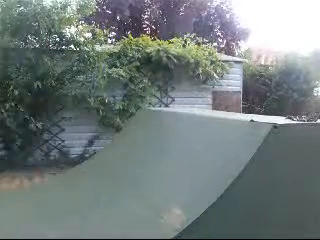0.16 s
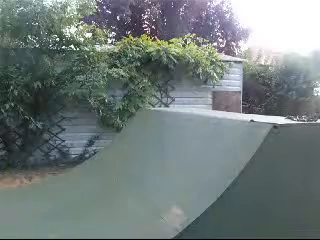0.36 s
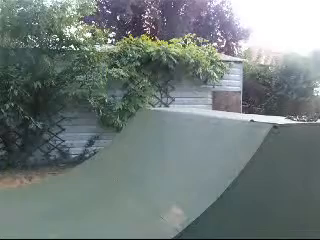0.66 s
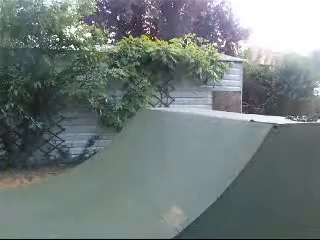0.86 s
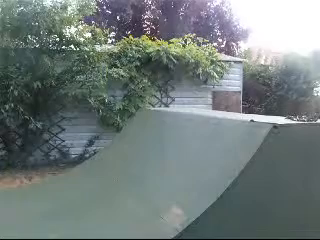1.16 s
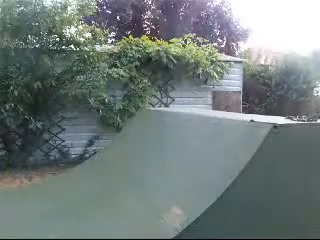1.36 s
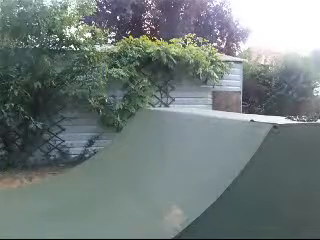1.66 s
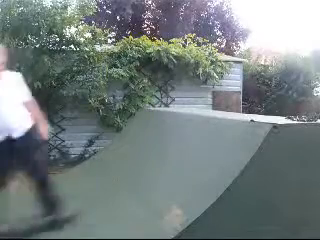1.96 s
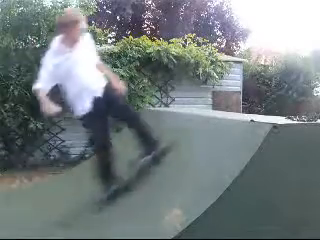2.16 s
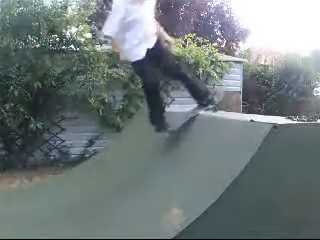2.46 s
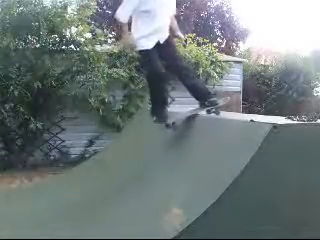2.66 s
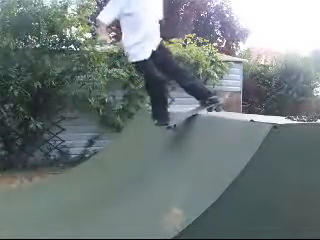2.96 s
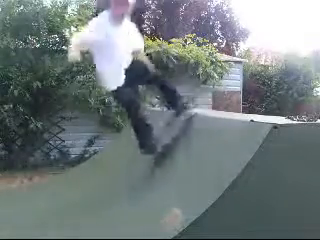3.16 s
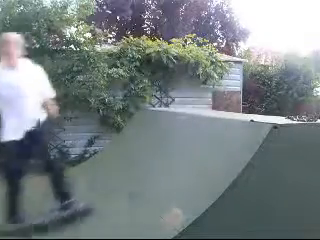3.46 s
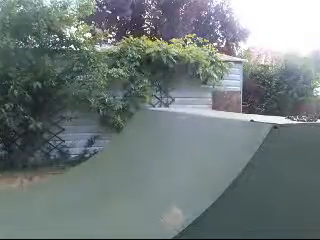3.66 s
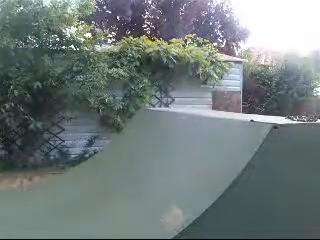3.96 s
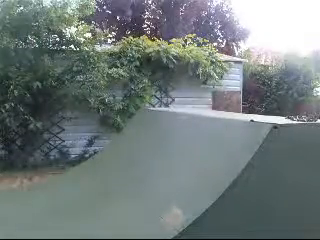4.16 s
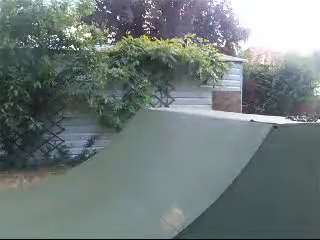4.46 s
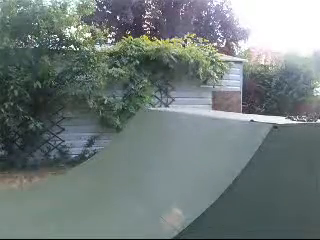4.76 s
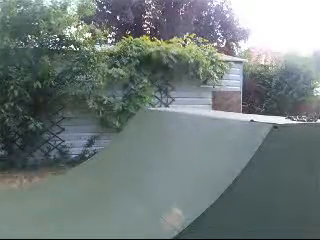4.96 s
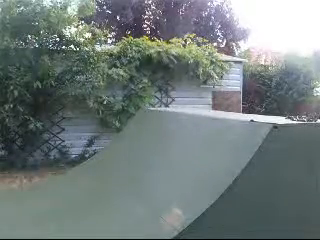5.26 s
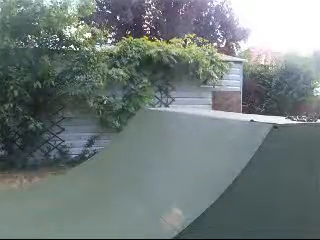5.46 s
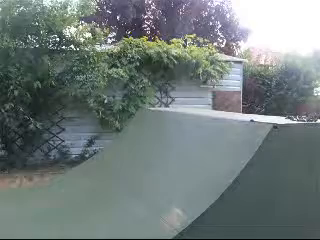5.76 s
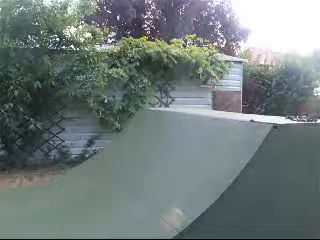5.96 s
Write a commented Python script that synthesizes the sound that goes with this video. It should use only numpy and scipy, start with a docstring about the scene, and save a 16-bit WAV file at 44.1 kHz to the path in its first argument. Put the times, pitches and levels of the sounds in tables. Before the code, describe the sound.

A skateboard rumbles back and forth on a hollow wooden ramp outdoors, with sharp clacks and heavy booming knocks while an engine drones faintly away.

```python
"""Garden, hollow wooden ramp: a skateboard rolls to and fro and clacks on the edge and the deck.
Rolling is noise and dense bumps through plywood modes; clacks and seams are noise snaps and ringing modes.
A short squeak is resonated noise. An engine, wavering low orders plus rough wash, drones into the distance.
Behind: outdoor air, wind puffs, a camera's whine; its one microphone overloads on the hardest hits."""
import sys
import numpy as np
from scipy import signal
from scipy.fft import rfft, irfft
from scipy.io import wavfile
from scipy.ndimage import uniform_filter1d

SR = 44100
rng = np.random.default_rng(int(sys.argv[2]) if len(sys.argv) > 2 else 0)


def store_pcm(level_fs):
    """Save levels as 16-bit WAV."""
    pcm = np.round(np.clip(level_fs, -1, 1) * 32767).astype(np.int16)
    wavfile.write(sys.argv[1], SR, np.atleast_2d(pcm).T)


N = 269010
T = np.arange(N) / SR


def amp(db):
    """Amplitude factor of a level in dB."""
    return 10 ** (np.asarray(db) / 20)


def noise(count=N):
    """White noise."""
    return rng.standard_normal(count)


def evened(x):
    """Scales to rms 1."""
    return x / np.sqrt(np.mean(x ** 2) + 1e-20)


def curve(rows, column):
    """One table column, interpolated at every sample."""
    rows = np.array(rows)
    return np.interp(T, rows[:, 0], rows[:, column])


def bells(rows):
    """Sum of Gaussian swells: centre_s, width_s, level_db."""
    return sum(amp(db) * np.exp(-((T - s) / width_s) ** 2) for s, width_s, db in rows)


def colour(x, points):
    """Filters by a spectrum (freq_hz, density_db), to rms 1."""
    freq_hz, db = np.transpose(points)
    bins_hz = np.fft.rfftfreq(len(x), 1 / SR)
    gain_db = np.interp(np.log(bins_hz + 1), np.log(freq_hz + 1), db)
    return evened(irfft(rfft(x) * amp(gain_db), len(x)))


def wobble(hz):
    """Slow random drift: noise low-passed at hz, rms 1."""
    return evened(signal.lfilter(*signal.butter(2, hz, fs=SR), noise()))


def resonate(x, hz, width_hz):
    """Moving resonance: shifts the curve hz to zero, smooths, shifts back; rms 1."""
    turn = np.exp(2j * np.pi * np.cumsum(hz) / SR)
    pole = np.exp(-np.pi * width_hz / SR)
    smooth = signal.lfilter([1 - pole], [1, -pole], x / turn)
    return evened((turn * smooth).real)


def add(mix, start_s, sound):
    """Adds a sound in place, cut at the end of the mix."""
    part = mix[round(start_s * SR):][:len(sound)]
    part += sound[:len(part)]


def ring(modes, spread_db, rise_s=0.00015, near_hz=None):
    """One blow, peak 1, cut at 1/3 s: mode shares depend on where it lands."""
    t, out = np.arange(SR // 3) / SR, 0
    for (hz, db, t60_s), (share, shift) in zip(modes, noise((len(modes), 2))):
        if near_hz:
            db = db - 4.5 * abs(np.log2(hz / near_hz))  # dB per octave away
        decay = amp(db + spread_db * share - 60 * t / t60_s)
        out = out + decay * np.sin(2 * np.pi * hz * (1 + 0.055 * shift) * t)
    out = out * (1 - np.exp(-t / rise_s))
    return out / abs(out).max()


# crack spectrum: freq_hz, density_db
CRACK_SPECTRUM = [(880, -4), (1500, 6.5), (2000, 5.5), (3500, 1), (6450, 0.5), (7970, 0), (12300, -5.5),
                  (15900, -43), (22000, -120)]


def snap(t60_s, rise_s):
    """Bright noise burst: fast rise, exponential decay."""
    t = np.arange(4096) / SR
    return colour(noise(4096), CRACK_SPECTRUM) * (1 - np.exp(-t / rise_s)) * amp(-60 * t / t60_s)


# wheel speed as heard, one sub-table per stretch: time_s, hiss_db
ROLL_STRETCHES = [
    [(0, -29), (.07, -34.5), (.19, -32), (.3, -50), (.39, -68)],
    [(1.03, -78), (1.27, -42), (1.385, -46), (1.41, -41), (1.59, -23), (1.75, -27.5), (2.1, -27.5),
     (2.28, -26), (2.45, -35.5), (2.545, -48)],
    [(3.22, -60), (3.35, -33.5), (3.55, -25), (3.75, -29), (3.88, -31), (4.09, -24.5), (4.21, -29.5),
     (4.36, -35), (4.42, -40.5), (4.55, -46), (4.7, -45.5), (4.9, -56.5)],
    [(5.6, -53.5), (5.72, -41), (5.78, -44.5), (5.9, -27), (6.1, -28.5)],
]
# rider's weight pressing into a curve of the ramp: centre_s, width_s, boom_db
PRESSES = [(0, .04, -13), (.19, 0.059, -19.5), (1.65, 0.17, -19.5), (2.2, 0.14, -22), (2.39, 0.053, -23),
           (3.6, 0.2, -17.5), (4.17, 0.12, -24), (4.32, .05, -27), (4.64, 0.061, -32), (5.8, 0.025, -24),
           (5.9, 0.082, -21), (6.1, .05, -18)]
# shoe or tail sliding, hiss alone: centre_s, width_s, level_db
SLIDES = [(1.36, 0.036, -37), (4.75, 0.16, -49), (5.67, 0.067, -40)]
# ramp modes, 3 of the hollow then the plywood: freq_hz, level_db, t60_s
RAMP_MODES = [(85.7, -19, 1), (102.5, 0.5, 0.26), (146.2, -10.5, 0.42), (201, 4.5, 0.045),
              (268.7, 0.5, 0.048), (321.6, -6.5, 0.09), (395.8, 0.5, 0.057), (491, -1, 0.036),
              (605, -3.5, 0.037), (672, -0.5, 0.02)]
# plywood rumble spectrum: freq_hz, density_db
RUMBLE_SPECTRUM = [(30, -30), (100, -3.5), (170, -10), (319, -3.5), (388, -4.5), (838, -13.5),
                   (1310, -14.5), (1600, -14.5), (2080, -21.5), (3520, -120)]
# grit hiss spectrum: freq_hz, density_db
HISS_SPECTRUM = [(530, -51), (900, -0.5), (1210, -6), (1350, 0.5), (1520, -11), (1810, -6.5), (2430, -7),
                 (3730, -8.5), (12300, -16.5), (15900, -53), (22000, -120)]
FULL_SPEED_HISS_DB, FULL_SPEED_ROAR_DB, ROAR_DB_PER_HISS_DB = -28, -22.5, 1.19
PRESS_ROAR_GAIN = 0.285  # roar added per unit of press
FLAT_BOOM_RE_HISS_DB = -11.5  # boom between presses
SHUDDER_RE_THUMP_DB, SHUDDER_T60_S = -21.5, 0.26  # plywood roars on after a thump
WHIRR_HZ, WHIRR_WANDER, WHIRR_WIDTH_HZ = 3760, .09, 280  # bearings; wander is a fraction


def impulses(per_s, db_scale, cap):
    """Sparse random impulses with exponentially spread levels."""
    return amp(db_scale * np.minimum(rng.exponential(1, N), cap)) * (rng.random(N) < per_s / SR)


def bumps_through(modes):
    """Dense small bumps of either sign drive a set of ramp modes."""
    bumps = impulses(1500, 1.15, 4) * rng.choice([-1, 1], N)
    return evened(signal.oaconvolve(bumps, ring(modes, spread_db=0))[:N])


def rolling():
    """Bumps under the wheels drive the plywood; grit hisses, bearings whirr."""
    boom = bumps_through(RAMP_MODES[:3])
    skin = bumps_through(RAMP_MODES[3:])
    roar = evened(skin + 0.71 * colour(noise(), RUMBLE_SPECTRUM))

    whirr_hz = WHIRR_HZ * (1 + WHIRR_WANDER * wobble(1.1))
    whirr = amp(1.5 * wobble(34)) * resonate(noise(), whirr_hz, WHIRR_WIDTH_HZ)
    grit = colour(impulses(1200, 5, 5), HISS_SPECTRUM)
    hiss = evened(colour(noise(), HISS_SPECTRUM) + 0.48 * grit + 0.28 * whirr)

    hiss_db = curve(np.vstack(ROLL_STRETCHES), column=1)
    press = bells(PRESSES)
    shudder = sum((T > s) * amp(thump_db + SHUDDER_RE_THUMP_DB - 60 * abs(T - s) / SHUDDER_T60_S)
                  for s, *_, thump_db, _ in CLACKS)
    speed_roar = amp(FULL_SPEED_ROAR_DB + ROAR_DB_PER_HISS_DB * (hiss_db - FULL_SPEED_HISS_DB))
    roar_gain = speed_roar + PRESS_ROAR_GAIN * press + shudder
    boom_gain = press + amp(hiss_db + FLAT_BOOM_RE_HISS_DB)
    hiss_gain = amp(hiss_db) + bells(SLIDES)

    unevenness = wobble(15.7)  # slow and random, shared by boom, roar and hiss
    wood = amp(1.2 * unevenness) * boom_gain * boom + amp(1.3 * unevenness) * roar_gain * roar
    return wood + hiss_gain * amp(1.35 * unevenness + 0.42 * wobble(210)) * hiss


# board and truck clacks: start_s, crack_db, board_db, board_hz, thump_db, thump_hz
CLACKS = [(0.0571, -3, -1, 655, -22, 85), (0.138, -12.5, 0.5, 1730, -6.5, 228),
          (0.16, -17, -12, 1100, -12, 240), (0.2114, -35, -15, 1500, -24, 102),
          (0.245, -33, -23, 1500, -29, 260), (0.313, -26, -21, 1360, -20.5, 102),
          (0.535, -24.5, -25, 1290, -42, 200), (0.6059, -33.5, -20, 696, -46, 300),
          (0.655, -23.5, -16, 1270, -44, 200), (0.933, -30, -28.5, 751, -52, 92),
          (1.0256, -24.5, -27.5, 1390, -46, 97), (1.142, -20, -15.5, 1090, -30, 118),
          (1.228, -24, -15.5, 732, -38, 200), (1.333, -26, -21, 942, -19, 250),
          (1.3557, -20, -32, 600, -32, 196), (1.391, -8, -3.5, 696, -1.5, 250),
          (1.3969, -13, -19, 748, 4, 210), (2.019, -13.5, -14, 1300, -6, 120),
          (2.462, -26, -20.5, 600, -20, 116), (2.5498, -9.5, -5, 1400, -13, 160),
          (2.6034, -23, -20, 930, -40, 92), (2.8, -22, -32, 676, -18, 326), (2.94, -35, -38, 700, -30, 317),
          (3.1812, -8.5, -5.5, 1190, -2.5, 393), (3.1862, -16, -31, 1080, -10.5, 373),
          (3.3012, -19.5, -23, 738, -22, 385), (3.3571, -5.5, 1.5, 785, -5.5, 149),
          (4.56, -4, -11.5, 760, -32, 300), (4.572, -23, -20, 700, -14, 300),
          (4.6042, -21, -32, 754, -16, 124), (4.6209, -19, -15.5, 1310, -13, 384),
          (4.6925, -28, -25, 700, -19, 267), (4.7286, -29.5, -41, 770, -47, 146),
          (4.766, -39, -38, 900, -40, 200), (4.817, -40, -36, 1210, -50, 201),
          (4.8663, -28, -31, 1210, -54, 92), (5.7284, -4, -11, 590, 5.5, 302),
          (5.7309, -6.5, -33, 633, -2, 129)]
# board modes: freq_hz, level_db, t60_s
BOARD_MODES = [(560, -2, .02), (680, -2, .02), (800, -1, .018), (940, -2, .018), (1070, 0, .018),
               (1230, -2, .016), (1390, -1, .016), (1770, -4, .012), (2100, -6, .012)]
CRACK_HZ, CRACK_LOG_SPREAD, CRACK_LOG_RISE_PER_DB = 3800, .08, 0.05  # rises as thump outweighs crack
CRACK_COLOUR, CRACK_WIDTH_HZ = 0.95, 1600
SCRAPE_RE_CRACK_DB, SCRAPE_TOP_DB, SCRAPE_S = -15.5, -26.5, 0.035
LANDING_THUMP_DB, LANDING_CUT_DB_PER_DB = -2, 7.5  # louder thump: landing on wheels, less scrape


def clacks():
    """Crack, rattling board, boom of the ramp, short scrape as the board settles."""
    out, t = np.zeros(N), np.arange(4096) / SR
    for start_s, crack_db, board_db, board_hz, thump_db, thump_hz in CLACKS:
        rise_s = .0007 * amp(-.65 * (crack_db + 8))  # softer blows start more slowly
        crack = snap(0.013 + 3.6 * rise_s, rise_s)
        excess_db = np.clip(thump_db - crack_db, -12, 12)
        crack_hz = CRACK_HZ * np.exp(CRACK_LOG_SPREAD * noise(1)[0] + CRACK_LOG_RISE_PER_DB * excess_db)
        # struck metal or tail colours the crack
        metal = resonate(crack, np.full(len(t), crack_hz), CRACK_WIDTH_HZ)
        add(out, start_s, amp(crack_db) * (crack + CRACK_COLOUR * crack.std() * metal))

        body = ring(BOARD_MODES, spread_db=2, near_hz=board_hz)[:2000]
        t_contact = t[:400]  # contact chatters for a few ms
        chatter = noise(400) * (1 - np.exp(-t_contact / rise_s)) * amp(-60 * t_contact / 0.022)
        board = signal.oaconvolve(chatter, body)
        add(out, start_s, amp(board_db) * board / abs(board).max())

        thump = ring(RAMP_MODES, spread_db=2, rise_s=.001, near_hz=thump_hz)
        add(out, start_s, amp(thump_db) * thump)

        landing_cut_db = LANDING_CUT_DB_PER_DB * max(thump_db - LANDING_THUMP_DB, 0)
        scrape_db = min(crack_db + SCRAPE_RE_CRACK_DB, SCRAPE_TOP_DB) - landing_cut_db
        stroke = np.clip(t / 0.0017, 0, 1) / (1 + (t / SCRAPE_S) ** 6)  # holds, then stops short
        rub = noise(len(t))
        rattle = evened(signal.oaconvolve(rub, body)[:len(t)])  # scrape shakes the board too
        add(out, start_s, amp(scrape_db) * stroke * (colour(rub, CRACK_SPECTRUM) + 0.95 * rattle))
    return out


# wheels crossing seams and screw heads: start_s, knock_db, tick_db
SEAMS = [(1.579, -2, -16), (1.657, -5, -40), (1.694, -8.5, -26), (1.736, -8.5, -7.5), (1.838, -36, -10.5),
         (2.095, -3, -7.5), (2.132, -6, -39), (2.17, -5.5, -21), (2.236, -5.5, -27), (2.333, -8.5, -22),
         (3.462, -9, -9.5), (3.536, -2, -49), (3.594, -14, -35), (3.613, -5.5, -37), (3.693, -9, -21),
         (3.781, -22, -13), (3.973, -11, -16), (5.889, -17.5, -10.5), (5.995, -10, -28), (6.036, -23, -9.5),
         (6.081, -11.5, -18)]


def seams():
    """Seams knock upper ramp modes through the soft wheel, with a thin tick."""
    out = np.zeros(N)
    for start_s, knock_db, tick_db in SEAMS:
        knock = ring(RAMP_MODES[4:], spread_db=3, rise_s=.009, near_hz=465)
        add(out, start_s, amp(knock_db) * knock)
        tick = snap(0.0089, 0.00068)
        thin_tick = np.diff(tick) + 0.39 * tick[1:]
        add(out, start_s, amp(tick_db) * thin_tick)
    return out


SQUEAK_START_S, SQUEAK_DB, SQUEAK_T60_S = 1.002, -28, 0.12
SQUEAK_HZ, SQUEAK_RISE_HZ, SQUEAK_TOP_S = 3400, 800, .018  # pitch jumps up, sinks back


def squeak():
    """Brief rough chirp of slipping rubber, shoe or bushing: resonated noise."""
    age_s = np.maximum(T - SQUEAK_START_S, 0)
    hz = SQUEAK_HZ + SQUEAK_RISE_HZ * np.exp(-4 * (age_s / SQUEAK_TOP_S - 1) ** 2)
    envelope = np.minimum(age_s / .006, 1) * amp(SQUEAK_DB - 60 * age_s / SQUEAK_T60_S)
    return envelope * resonate(noise(), hz, width_hz=340)


# wall and fence: delay_s, level_db
ECHOES = [(0.017, -18), (.021, -18)]


def garden(x):
    """Two echoes and a short scatter from wall and bushes."""
    t = np.arange(SR // 5) / SR
    scatter = noise(len(t)) * amp(-60 * t / .16) * (t > .004)
    response = amp(-14) * scatter / np.linalg.norm(scatter)
    response[0] = 1  # direct sound
    for delay_s, db in ECHOES:
        smear = noise(12)  # rough surfaces blur each echo
        add(response, delay_s, amp(db) * smear / np.linalg.norm(smear))
    return signal.oaconvolve(x, response)[:N]


# firing rate: time_s, rate_hz
FIRING = [(0, 18.6), (1, 17.3), (2, 17.6), (3.3, 16.8)]
# order levels: time_s, order1_db, order2_db, order3_db
ENGINE_ORDERS = [(0, -30, -8.5, -30), (.35, -26, -26.5, -15.5), (1.05, -30.5, -42, -25.5),
                 (1.5, -42, -17.5, -26), (2.4, -31.5, -23, -28), (2.8, -27, -31.5, -31.5),
                 (3.3, -36.5, -49, -50)]
# upper orders: multiple, level_re_order3_db
UPPER_ORDERS = [(4, -7.5), (5, -19), (6, -19.5)]
# rough wash spectrum: freq_hz, density_db
EXHAUST_SPECTRUM = [(40, -21), (90, 1), (150, -10.5), (450, -26), (900, -53)]
EXHAUST_DB = -20  # rms against the peak of order 3


def engine():
    """Low orders of an uneven firing rate, each wavering, gone when far off."""
    turns = np.cumsum(curve(FIRING, column=1) * (1 + .035 * wobble(5))) / SR
    levels = [(k, curve(ENGINE_ORDERS, column=k)) for k in (1, 2, 3)]
    order3_db = levels[2][1]
    levels += [(k, order3_db + db + 1.2 * wobble(12.0)) for k, db in UPPER_ORDERS]
    drone = sum(amp(db + 2.5 * wobble(7)) * np.sin(2 * np.pi * (k * turns + rng.random()))
                for k, db in levels)
    wash = amp(order3_db + EXHAUST_DB + 0.83 * wobble(18)) * colour(noise(), EXHAUST_SPECTRUM)
    fade = np.clip((ENGINE_ORDERS[-1][0] + 0.17 - T) / 0.28, 0, 1)
    return np.sqrt(2) * (drone + wash) * fade


# garden and far traffic: freq_hz, density_db
AIR_SPECTRUM = [(15, -34), (25, 5), (60, 6), (370, -15), (444, -5.5), (546, -7), (622, -3), (967, -1),
                (1220, -2.5), (1900, -11), (2100, -10.5), (4580, -16.5), (7490, -13.5), (12300, -23.5),
                (15900, -56), (22000, -120)]
AIR_DB = -42.5
# wind puffs on the microphone: centre_s, level_db, width_s
GUSTS = [(4.868, -30, 0.0073), (5.0, -33, 0.037), (5.08, -40.5, 0.047), (5.17, -50, .04)]
# camera drive tones: freq_hz, level_db
WHINE = [(7678.5, -66), (7707.6, -66), (8294, -67), (8323, -66)]


def background():
    """Steady outdoor air, noise puffs of wind, thin sine whine of the camera."""
    air = amp(AIR_DB + 0.21 * wobble(4.5)) * colour(noise(), AIR_SPECTRUM)
    puffs = colour(noise(), [(20, 1.0), (50, 7), (120, -0.5), (400, -23.5), (1000, -64)])
    swells = bells((s, width_s, db) for s, db, width_s in GUSTS)
    wind = swells * amp(5.3 * wobble(28)) * puffs
    whine = sum(np.sqrt(2) * amp(db) * np.sin(2 * np.pi * (hz * T + rng.random())) for hz, db in WHINE)
    return air + wind + whine


def scene():
    """All sources, same signal in both channels; clacks, seams and squeak echo in the garden."""
    echoed = garden(clacks() + seams() + squeak())
    return np.tile(rolling() + echoed + engine() + background(), (2, 1))


# microphone housing dips: freq_hz, width_hz
HOUSING_DIPS = [(1550, 110), (2430, 300)]
EDGE_HZ = 12400  # upper band limit
DUCK_THRESHOLD_DB, DUCK_DB_PER_DB, RECOVERY_DB_PER_S = -13.0, .6, 90.  # recovery of the held level


def record(dry):
    """Housing dents the response, gain control ducks after loud hits, input clips; then band limit."""
    for hz, width_hz in HOUSING_DIPS:
        dry = dry - .55 * signal.lfilter(*signal.iirpeak(hz, hz / width_hz, fs=SR), dry)
    power_db = 10 * np.log10(abs(uniform_filter1d(dry[0] ** 2, 200)) + 1e-12)
    fall_db = T * RECOVERY_DB_PER_S
    held_db = np.maximum.accumulate(power_db + fall_db) - fall_db
    over_db = np.maximum(held_db - DUCK_THRESHOLD_DB, 0)
    late_db = signal.lfilter([.002], [1, -.998], over_db)  # acts some 10 ms late
    clipped = np.clip(dry / amp(DUCK_DB_PER_DB * late_db), -.95, .95)
    low_pass = signal.firwin(511, EDGE_HZ, window=("kaiser", 9), fs=SR)
    return signal.oaconvolve(clipped, low_pass[None], "same")


dry = scene()
out = record(dry)
store_pcm(out)
```